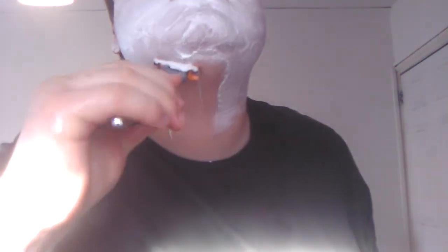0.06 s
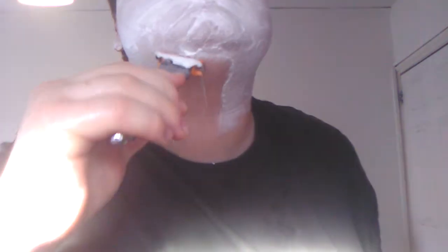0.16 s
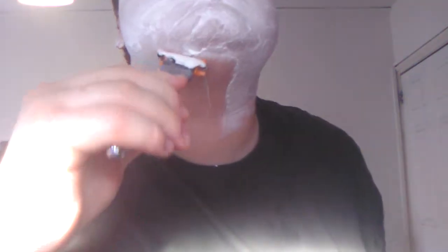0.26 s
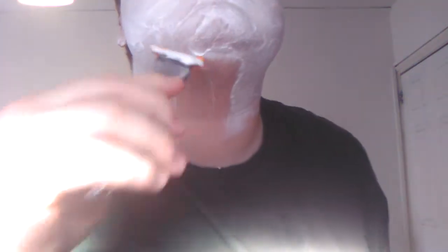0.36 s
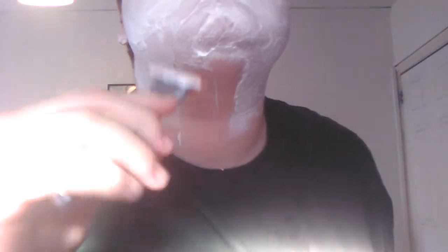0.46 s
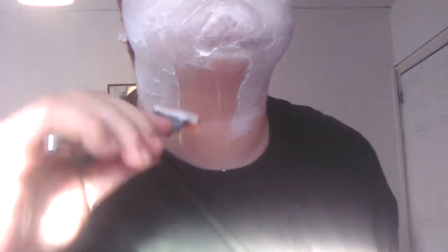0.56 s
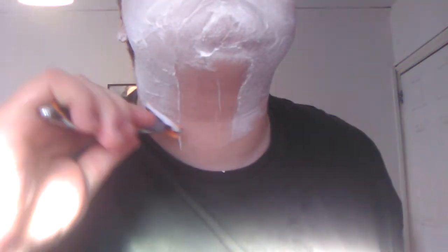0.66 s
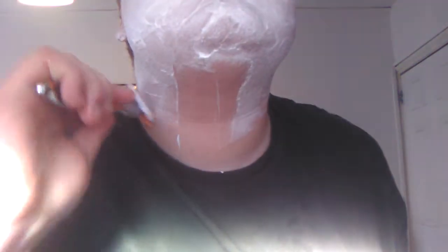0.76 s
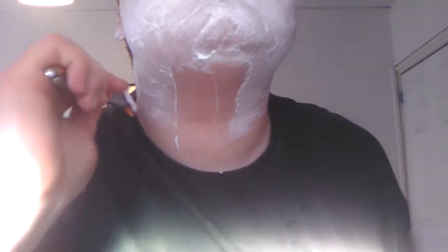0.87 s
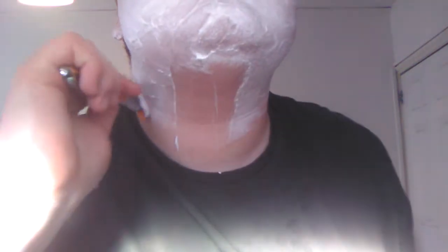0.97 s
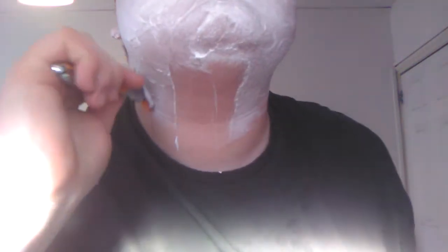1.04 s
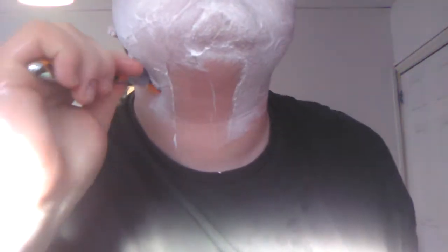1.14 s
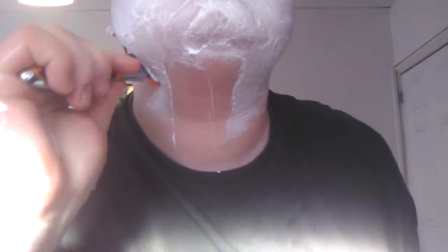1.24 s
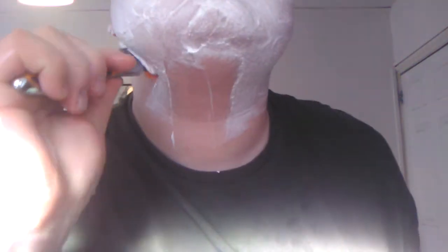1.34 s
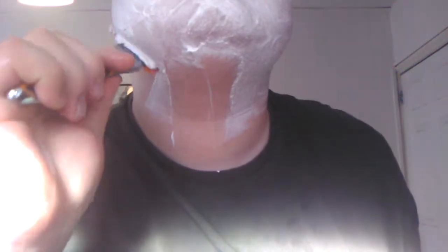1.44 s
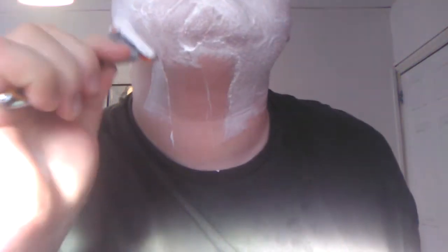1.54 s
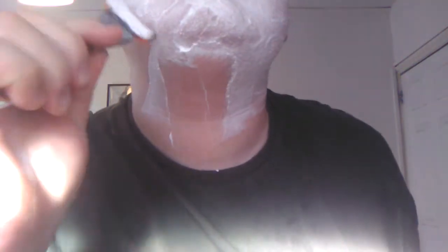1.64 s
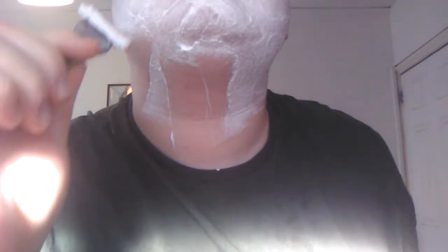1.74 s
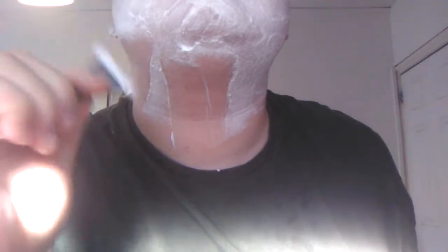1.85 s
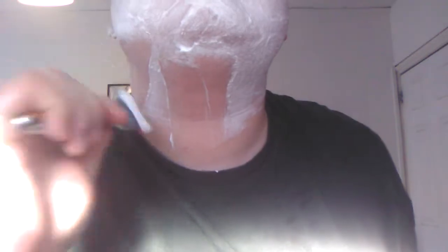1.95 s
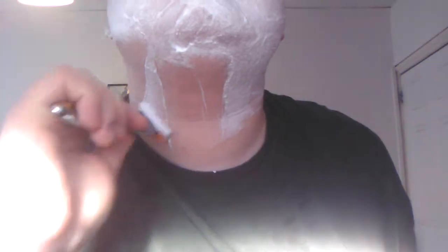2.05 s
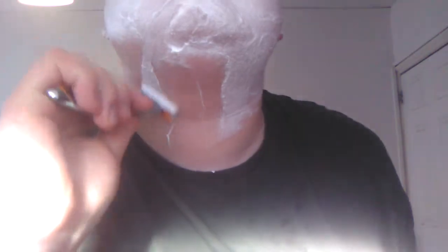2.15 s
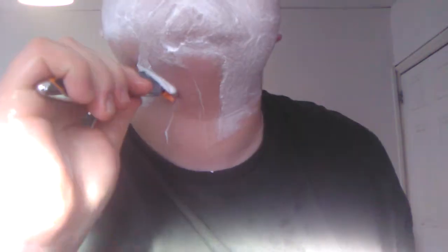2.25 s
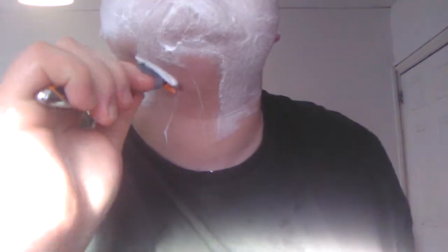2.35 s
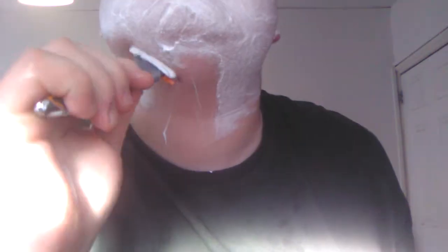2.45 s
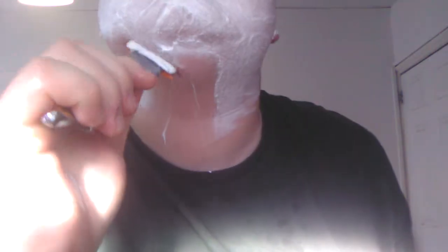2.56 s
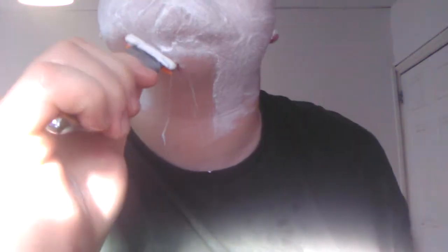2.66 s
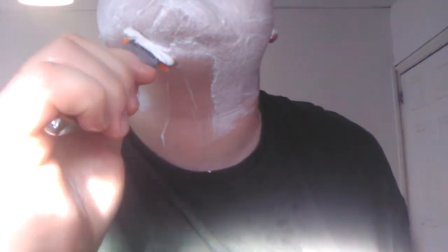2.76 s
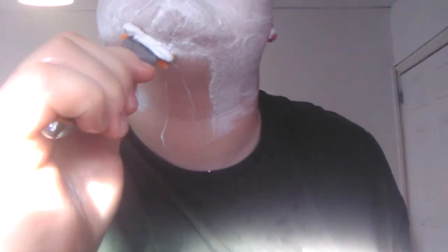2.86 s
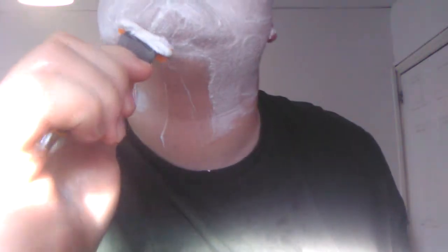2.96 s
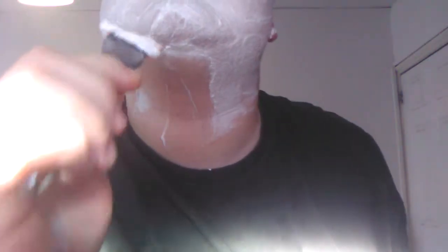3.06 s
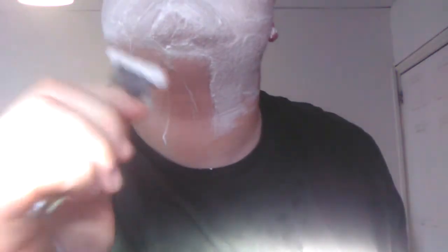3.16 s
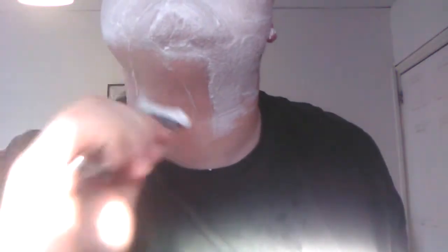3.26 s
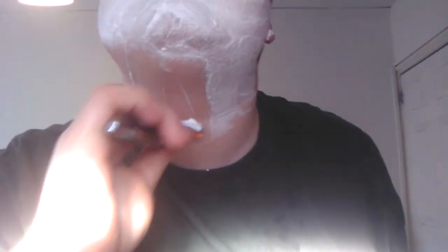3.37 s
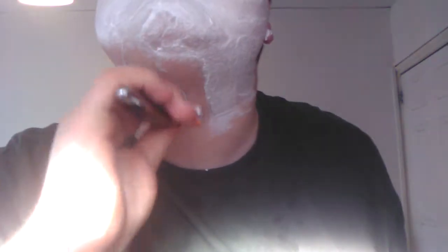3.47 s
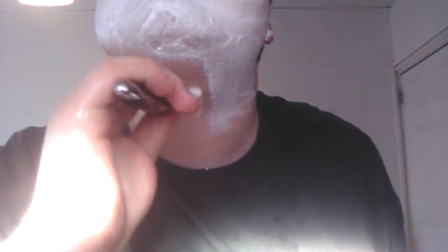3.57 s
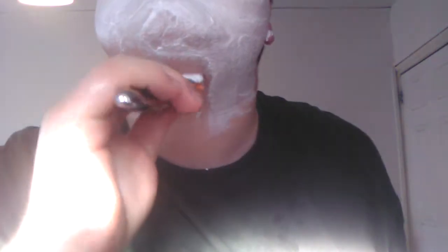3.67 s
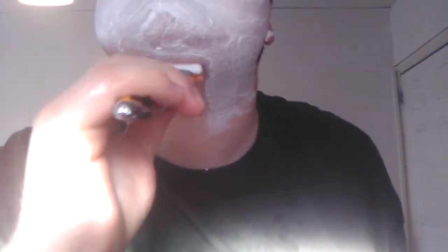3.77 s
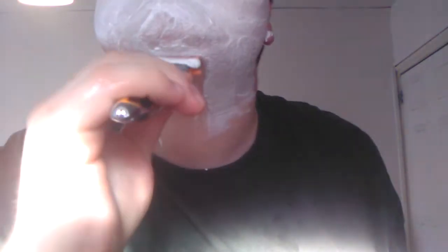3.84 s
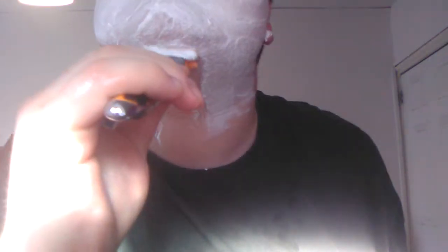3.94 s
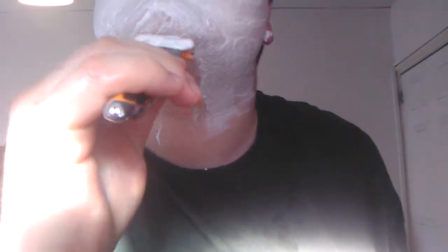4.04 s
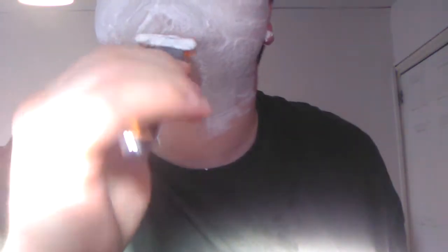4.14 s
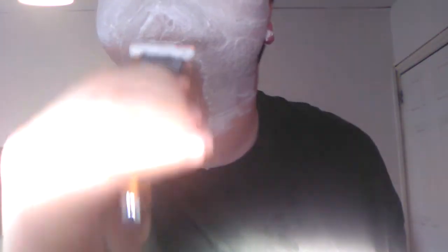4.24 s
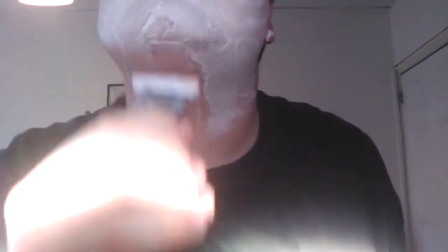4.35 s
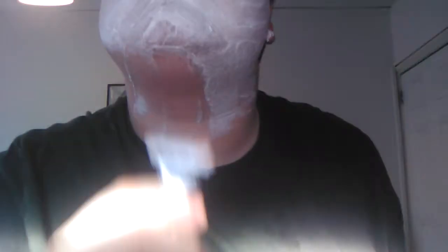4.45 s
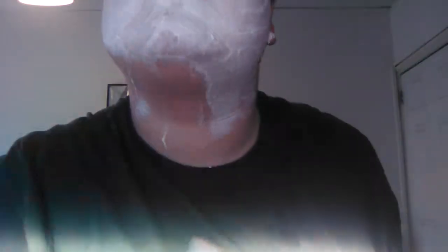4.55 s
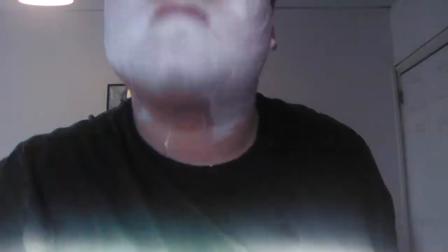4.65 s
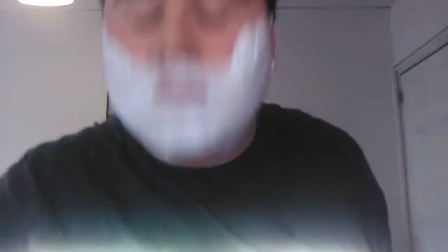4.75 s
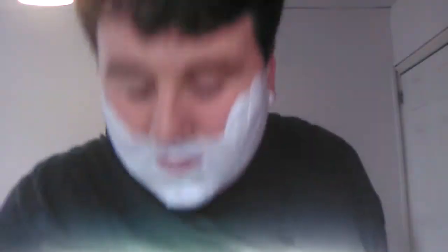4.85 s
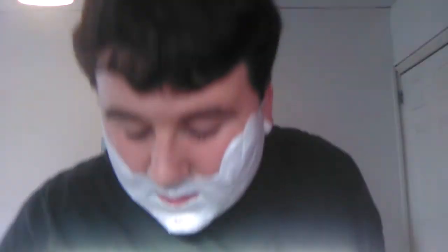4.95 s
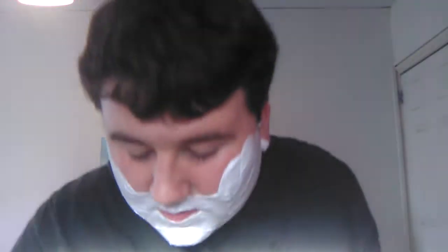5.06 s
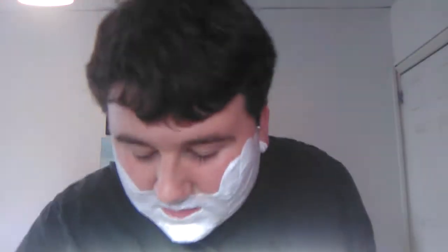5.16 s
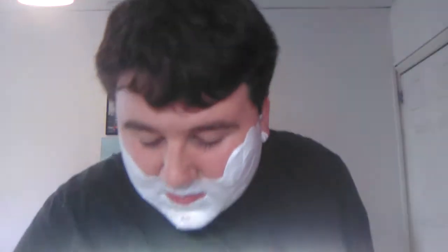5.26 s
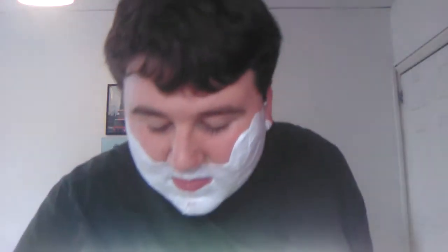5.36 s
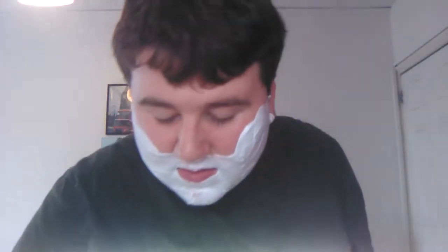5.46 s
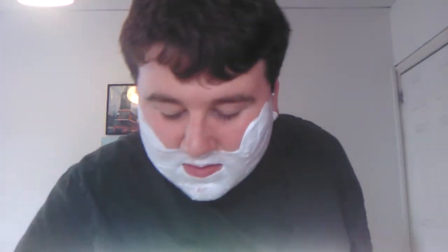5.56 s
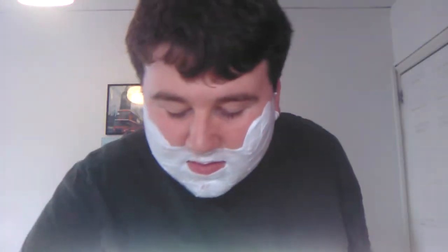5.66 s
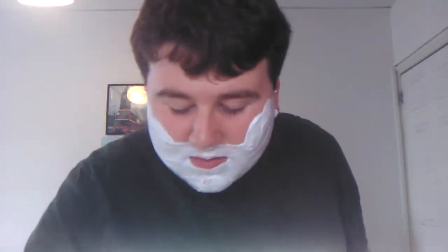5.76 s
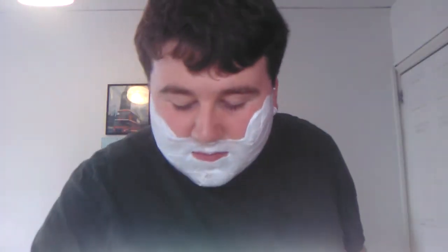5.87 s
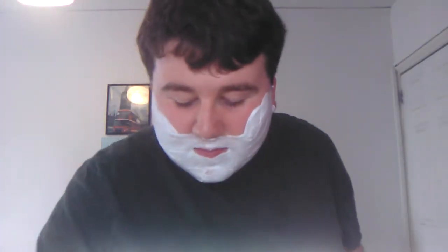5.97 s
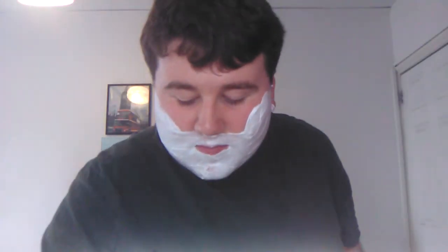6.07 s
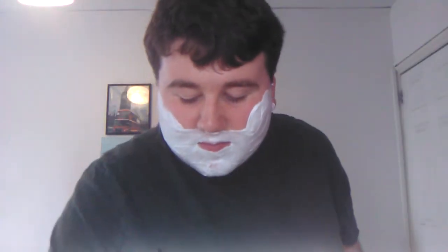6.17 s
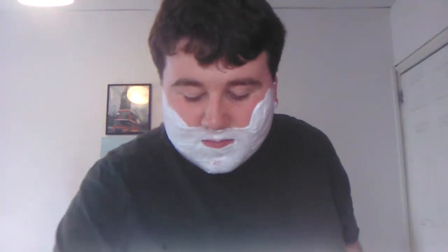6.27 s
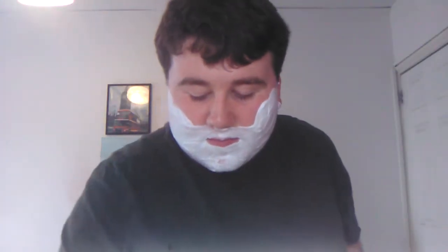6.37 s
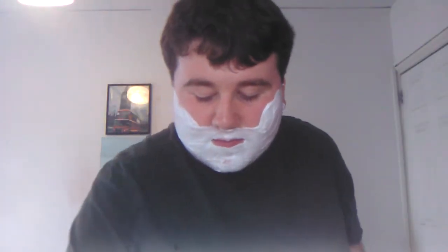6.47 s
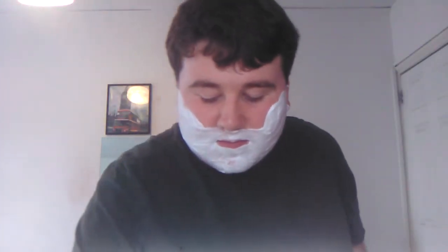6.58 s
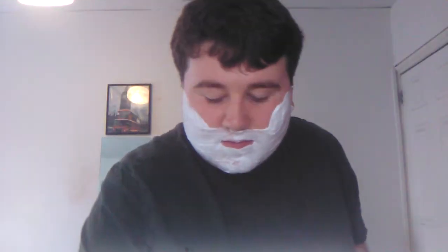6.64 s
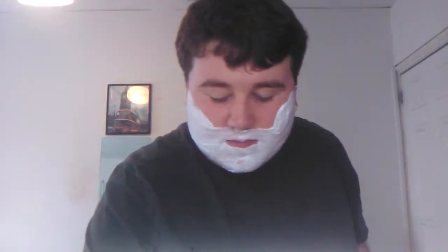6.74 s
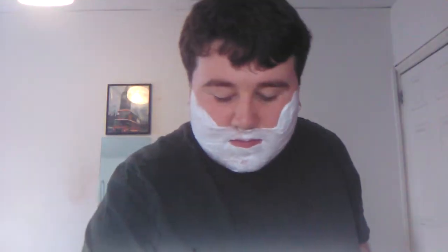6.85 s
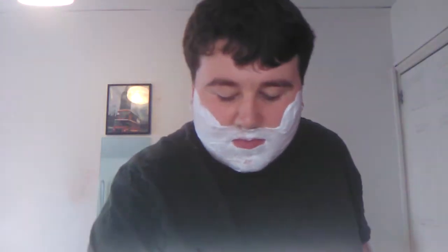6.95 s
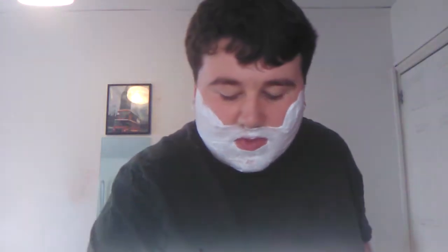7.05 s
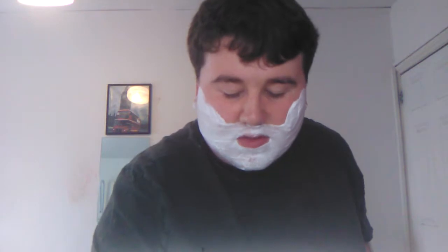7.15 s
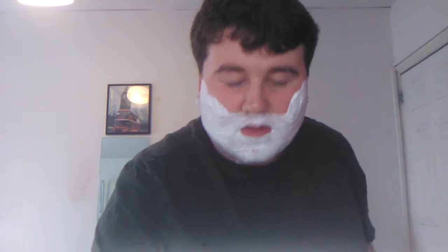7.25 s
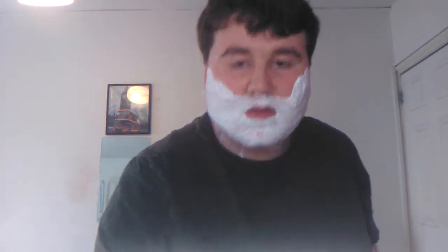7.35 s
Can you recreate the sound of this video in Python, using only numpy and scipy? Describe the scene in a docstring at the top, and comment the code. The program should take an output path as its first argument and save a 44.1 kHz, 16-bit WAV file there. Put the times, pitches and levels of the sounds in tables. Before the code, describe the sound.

Dry, grainy shaving scrapes come in separate strokes with short pauses, finishing in sharp little flicks, over faint room noise and a distant low engine drone at first. A soft knock and a dull bump fall between them. Then much louder water: the razor is shaken rapidly in a basin below the microphone, bubbling and splattering, before the water thins and the razor clicks against the rim. Small, lightly reverberant room.

```python
"""Short rasping strokes, a razor drawn up a foamed neck close to a stereo microphone in a small bare room:
clumped random clicks plus friction noise, shaped by spectra and stroke curves.
It is then shaken in a basin of water: rising-pitch bubbles, noise splashes and spray, thumps as noise
drives the basin's modes, a last tap as struck modes.
Under it lie the room's murmur, a wavering noise band, a far engine drone and air on the microphone."""
import sys
import numpy as np
from scipy import signal
from scipy.fft import rfft, irfft, next_fast_len
from scipy.io import wavfile
from scipy.ndimage import map_coordinates

SR = 44100
rng = np.random.default_rng(int(sys.argv[2]) if len(sys.argv) > 2 else 0)


def unload_wav(signal):
    """Save mono or channel-first audio to the path in sys.argv[1] as 16-bit WAV at rate SR, clipped to [-1, 1]."""
    wavfile.write(
        sys.argv[1],
        SR,
        np.round(np.clip(np.atleast_2d(signal).T, -1, 1) * 32767).astype(np.int16),
    )


N = 326781
T = np.arange(N) / SR
SIZE = next_fast_len(N)
ROOM_TAIL_DB = 6.5   # tail energy against a unit direct click

# Stereo tilt of the near sounds. Each row: frequency in Hz, left minus right in dB.
EARS = [(370, -4), (690, -2), (1270, 2), (2330, 4.5), (4290, 8.5), (7900, -4.5), (14600, -14.5)]
# Vigour of the rinse. Each row: time in seconds, churn level in dB, spray against the churn in dB.
RINSE = [(5.06, -64, -1), (5.1, -37.5, -13), (5.16, -51, -1), (5.23, -42, -9), (5.38, -36.5, -8.5),
         (5.47, -38, -5.5), (5.62, -33.5, -3), (5.74, -32.5, 2.5), (6.0, -36, -4.5), (6.15, -33.5, -3.5),
         (6.31, -33, -5), (6.45, -31.5, -6), (6.58, -34.5, -5.5), (6.72, -31, -9.5), (6.84, -43, -2.5),
         (6.95, -41.5, -7.5), (7.12, -48, -6.5), (7.26, -42.5, -0.5), (7.41, -45.5, -8)]
# Shakes of the razor under water. Each row: start in seconds, wave's push on the basin in dB,
# tilt towards the upper basin modes in dB per octave, swell of the churn's large bubbles in dB.
SHAKES = [(5.095, -63, 5, 5.5), (5.319, -61, 10, 5), (5.381, -74, 19.5, 1.5), (5.504, -60, 0, 8.5),
          (5.656, -60.5, 3.5, 9), (5.816, -63.5, 2.5, 9), (5.972, -59, -5, 5.5), (6.124, -54, -7, 3.5),
          (6.286, -59.5, -0.5, 9), (6.442, -62, 3, 2.5), (6.609, -62, -26, 5)]


def amp(db):
    """Decibels to an amplitude factor."""
    return 10 ** (np.asarray(db) / 20)


def rms_one(x):
    """Scale to rms 1 over all channels."""
    return x / np.sqrt(np.mean(x ** 2) + 1e-20)


def in_time(rows):
    """Columns joined by straight lines; the first, a level, is silent outside the rows."""
    s, level_db, *rest = np.transpose(rows)
    curves = [np.interp(T, s, level_db, -120, -120)]
    return curves + [np.interp(T, s, column) for column in rest]


def at_hz(points):
    """A spectrum read at every bin of the transform, straight lines over log frequency."""
    hz, value = np.transpose(points)
    bins_hz = np.arange(SIZE // 2 + 1) * SR / SIZE
    return np.interp(np.log(bins_hz + 1), np.log(hz), value)


def colour(x, spectrum, balance):
    """Two channels filtered by a spectrum, closed at its low end, and tilted left to right; rms 1."""
    closed = [(spectrum[0][0] / 2, -120)] + list(spectrum)
    gain = amp(at_hz(closed) + at_hz(balance) * [[.5], [-.5]])
    return rms_one(irfft(rfft(x, SIZE) * gain, SIZE)[:, :N])


def pair(likeness):
    """White noise in two channels, correlated by band as the table says."""
    mid, side = rfft(rng.standard_normal((2, SIZE)))
    alike = np.clip(at_hz(likeness), -1, 1)
    both = np.sqrt(1 + alike) * mid + np.sqrt(1 - alike) * side * [[1], [-1]]
    return irfft(both, SIZE)[:, :N]


def drift(rate_hz):
    """Slow random curve, spread about 1: random knots at twice the rate, joined smoothly."""
    knots = rng.standard_normal(1000)
    return map_coordinates(knots, [T * rate_hz * 2], order=3)


def grains(per_s, spread_db):
    """Random clicks of uneven size and sign; rms 1."""
    size_db = spread_db * np.minimum(rng.exponential(1, N), 5)
    sizes = amp(size_db) * rng.choice([-1, 1], N)
    return rms_one(sizes * (rng.random(N) < per_s / SR))


def ring(push, hz, t60_s):
    """Damped resonator: a unit click sets off a decaying sine of starting height 1."""
    r, w = amp(-60 / (t60_s * SR)), 2 * np.pi * hz / SR
    return signal.lfilter([0, np.sin(w)], [1, -2 * r * np.cos(w), r * r], push)


def struck(hits, modes):
    """Every blow rings every mode of the body with a strength of its own."""
    s, hit_db = np.transpose(hits)
    uneven_db = rng.normal(0, 1.5, (len(s), len(modes)))
    out = 0
    for k, (hz, mode_db, t60_s) in enumerate(modes):
        clicks = np.full(N, 1e-18)
        clicks[(s * SR).astype(int)] = amp(hit_db + mode_db + uneven_db[:, k]) * (-1) ** k
        out = out + ring(clicks, hz, t60_s)
    return out


def scatter(delays_s):
    """A click smeared by a chain of short all-pass echoes, which leave its colour alone."""
    x = (T[:SR // 3] == 0) * 1.
    for s in delays_s:
        loop = np.r_[1, np.zeros(int(s * SR) - 1), -.6]
        x = signal.lfilter(loop[::-1], loop, x)
    return x


def room(x, tail_db=ROOM_TAIL_DB):
    """Direct sound plus decaying tail: bass partly shared by both ears, treble scattered apart and dulled."""
    t60_s, wall_cut_hz, split_hz = 0.52, 3800, 1016
    # Echo delays off basin and body. Each row, left then right: first and second delay in seconds.
    echo_delays = [(.0002, .0008), (.0004, .0013)]
    t = T[:SR // 3]
    shared, *ears = rng.standard_normal((3, len(t)))
    fade = amp(-60 * t / t60_s) * (t > .003)
    fade *= amp(tail_db) / np.linalg.norm(fade)
    full = (t == 0) + fade * (0.32 * shared + 0.38 * np.array(ears))
    low = signal.lfilter(*signal.butter(2, split_hz, fs=SR), full)
    dull = signal.lfilter(*signal.butter(1, wall_cut_hz, fs=SR), fade * ears)
    early = np.array([scatter(delays) for delays in echo_delays])
    high = signal.lfilter(*signal.butter(2, split_hz, "high", fs=SR), early + dull)
    return signal.fftconvolve(x[None], low + high, axes=1)[:, :N]


def murmur():
    """Room murmur: broad noise of a fixed spectrum whose level drifts slightly."""
    # Each row: frequency in Hz, relative density in dB per Hz.
    spectrum = [(41, -25), (70, 2.5), (218, -3.5), (319, -2), (522, -19.5), (700, -9), (850, -13.5),
                (1000, -12), (1330, -23.5), (1590, -17.5), (2030, -29), (2430, -26), (5810, -34.5),
                (14500, -34)]
    # Each row: frequency in Hz, left minus right in dB.
    balance = [(200, -1), (700, -2), (2330, 3), (4290, 2.5), (7900, -2)]
    # Each row: frequency in Hz, left-right correlation.
    likeness = [(180, 1), (540, 0.48), (1400, -0.13), (3000, -0.096)]
    level_db = -48.5 + 0.44 * drift(2.75)
    return amp(level_db) * colour(pair(likeness), spectrum, balance)


def waver():
    """A faint noise band with a wandering centre: slow noise multiplied by a gliding sine."""
    # Each row: time in seconds, centre in Hz, sine's peak in dB.
    glide = [(.75, 970, -65), (0.862, 985, -52), (1.2, 851, -61), (1.45, 860, -50), (1.751, 794, -56),
             (1.9, 800, -92)]
    s, hz, db = np.transpose(glide)
    lowpass = signal.butter(2, 55, fs=SR, output="sos")
    slow = rms_one(signal.sosfilt(lowpass, rng.standard_normal((2, N))))
    carrier = np.sin(2 * np.pi * np.cumsum(np.interp(T, s, hz)) / SR)
    return slow * amp(np.interp(T, s, db, -120, -120)) * carrier


def drone():
    """Far engine: one low sine gliding in pitch and level."""
    # Each row: time in seconds, pitch in Hz, rms level in dB.
    glide = [(0.119, 44.6, -49), (.3, 46.2, -30), (.47, 50.6, -46), (.57, 53.8, -40), (.66, 50.8, -46),
             (.85, 44.84, -31), (0.969, 45.2, -39), (1.08, 42.7, -67), (1.22, 43, -37), (1.35, 47, -58)]
    s, hz, db = np.transpose(glide)
    tone = np.sin(2 * np.pi * np.cumsum(np.interp(T, s, hz)) / SR)
    return np.sqrt(2) * amp(np.interp(T, s, db, -120, -120)) * tone


def air():
    """Lumpy air on the microphone ports: very low sway and a faster flutter from the same noise."""
    # Each row: time in seconds, sway level in dB, mean flutter level in dB.
    levels = [(0, -31, -32.5), (.15, -32, -48), (2.0, -36, -57), (2.2, -28, -47), (2.4, -31.5, -38),
              (2.85, -33, -43), (3.1, -38, -51.5), (4.3, -34, -69), (4.7, -28, -53), (5.3, -34.5, -70),
              (5.75, -26.5, -75), (6.6, -30, -52), (6.9, -34, -74), (7.41, -28, -75)]
    # Each row: frequency in Hz, left-right correlation.
    likeness = [(12, .85), (25, .6), (100, .5)]
    sway_db, flutter_db = in_time(levels)
    gusts = pair(likeness)
    # spectra: Hz, relative dB per Hz; balances: Hz, left minus right dB
    sway = colour(gusts, [(4, 11.0), (22, 1.5), (34, -18.0), (60, -13.5), (100, -64.0)],
                  [(10, 0), (20000, 0)])
    flutter = colour(gusts, [(30, 1.0), (50, 3.5), (100, -9.5), (170, -12.5), (400, -51.0)],
                     [(30, 1.2), (200, 3.2)])
    return amp(sway_db) * sway + amp(flutter_db + 4.9 * drift(10)) * flutter


def puffs():
    """Air from the moving hand: each puff a push and pull of pressure, stronger on the left port."""
    # Each row: centre in seconds, peak before panning in dB.
    pushes = [(2.171, -33.5), (2.228, -36.5), (2.373, -26), (2.452, -25), (2.599, -29.5), (2.919, -32.5)]
    half_width_s, left_minus_right_db = 0.0035, 15.5
    out = 0
    for s, peak_db in pushes:
        u = (T - s) / half_width_s
        out = out - amp(peak_db) * u * np.exp(.5 - .5 * u ** 2)
    return out * amp([[left_minus_right_db / 2], [-left_minus_right_db / 2]])


def knocks():
    """A soft knock and a dull bump as struck modes, then the razor bouncing on the rim; a little to the left."""
    # Soft knock. Each row: start in seconds, strike in dB.
    tocks = [(.733, -47)]
    # Its modes. Each row: frequency in Hz, relative level in dB, t60 in seconds.
    wood = [(690, 10, 0.015), (900, 10, 0.025), (1540, -6, 0.015)]
    # Dull bump. Each row: start in seconds, strike in dB.
    bumps = [(3.09, -40)]
    # Its modes. Each row: frequency in Hz, relative level in dB, t60 in seconds.
    bump_modes = [(242, 0, 0.052), (385, -2.2, 0.077)]
    # Razor on the rim. Each row: start in seconds, strike in dB.
    taps = [(7.1772, -0.5), (7.191, -13), (7.205, -14), (7.218, -10)]
    # Its modes. Each row: frequency in Hz, relative level in dB, t60 in seconds.
    razor_modes = [(2170, -7.5, 0.0084), (2550, -8, 0.0099), (3970, -24.5, 0.016)]
    dull = room(struck(tocks, wood) + struck(bumps, bump_modes))
    rim = room(struck(taps, razor_modes), tail_db=-3)   # nearer than the water: less tail
    return (dull + rim) * amp([[1.5], [-1.5]])


def waves(rise_s, fall_s):
    """A wave does not land at once: a noisy push that swells and fades drives the basin's modes."""
    # Each row: frequency in Hz, relative drive in dB, t60 in seconds.
    basin = [(147, -5, 0.19), (163.3, 0.5, 0.1), (222.5, 4, 0.051), (296, 1.5, 0.054), (382.2, -8, 0.64)]
    s, push_db, lift_db, _ = np.transpose(SHAKES)
    t = T[:SR // 4]
    swell = (1 - np.exp(-t / rise_s)) * np.exp(-t / fall_s)
    out = 0
    for hz, mode_db, t60_s in basin:
        octaves = np.log2(hz / basin[1][0])   # from the second mode
        starts = np.zeros(N)
        starts[(s * SR).astype(int)] = amp(push_db + mode_db + lift_db * octaves)
        push = signal.fftconvolve(starts, swell)[:N] * rng.standard_normal(N)
        out = out + ring(push, hz, t60_s)
    return signal.sosfilt(signal.butter(2, [115, 600], "band", fs=SR, output="sos"), out)


def bubbles(rows, cycles, rise, attack=0.98):
    """Dying sines whose pitch climbs as the bubble nears the surface; each rings so many nominal cycles."""
    out, t = np.zeros(N + SR), T[:SR // 12]
    for s, db, hz in rows:
        turns = hz * t[:int(cycles / hz * SR)]
        shape = amp(db - 60 * turns / cycles) * (1 - np.exp(-attack * turns))
        out[int(s * SR):][:len(turns)] += shape * np.sin(2 * np.pi * turns * (1 + rise * turns / cycles))
    return out[:N]


def swarm(low_hz, high_hz, cycles, spread_db, count):
    """Bubbles born at random moments of the rinse, with random sizes; rms 1."""
    moment, size, loud = rng.random((count, 3)).T
    start = RINSE[0][0]
    starts = start + moment * (T[-1] - start)
    levels_db = -spread_db * np.log(loud + 0.067)
    pitches_hz = low_hz * (high_hz / low_hz) ** size
    return rms_one(bubbles(zip(starts, levels_db, pitches_hz), cycles, rise=0.1))


def single_bubbles():
    """Separate bubbles: dying sines, gently rising in pitch, all with one decay time."""
    # Each row: start in seconds, level before onset and room in dB, starting pitch in Hz.
    rows = [(5.214, -12.5, 737), (5.344, -9.5, 760), (5.388, -9, 384), (5.411, -7.5, 737),
            (5.469, -12, 550), (5.471, -24.5, 3480), (5.507, -8, 930), (5.535, -5.5, 750), (5.56, -2, 683),
            (5.659, -16.5, 1600), (5.697, -22, 666), (5.713, -6, 713), (5.736, -10, 760), (5.75, -10, 800),
            (5.775, -15.5, 2080), (5.821, -9, 1417), (5.874, -14, 696), (6.03, -2, 728), (6.088, -8, 570),
            (6.145, -15, 1850), (6.247, -15, 2600), (6.262, -21, 2490), (6.29, -11, 820), (6.321, -8, 1364),
            (6.328, -14, 750), (6.35, -7.5, 790), (6.436, -20, 780), (6.454, -26, 4130), (6.488, -17, 1900),
            (6.52, -20, 3600), (6.552, -5, 750), (6.639, -19, 2500), (6.697, -18, 3600), (6.66, -9.5, 760),
            (6.702, -6, 736), (6.748, -13.5, 557), (6.865, -29, 2550), (6.896, -21, 2264),
            (6.934, -23, 2800), (6.936, -28, 4090), (6.947, -23, 1410), (6.988, -24, 2520),
            (7.084, -29, 3920), (7.257, -23, 2170), (7.296, -14.5, 836), (7.325, -17.5, 754)]
    t60_s = 0.032
    singles = sum(bubbles([row], cycles=t60_s * row[2], rise=0.032, attack=0.71) for row in rows)
    return room(singles, tail_db=1.5)


def splats(wash):
    """Each drop bursts with a short crack around its own pitch, then a broad spatter dies away."""
    # Each row: start in seconds, level in dB, pitch of the crack in Hz.
    drops = [(5.095, -37.5, 3500), (5.195, -33, 5800), (5.2227, -32, 10500), (5.283, -43, 9000),
             (5.298, -33.5, 10200), (5.338, -31.5, 5000), (5.453, -41, 9500), (5.4988, -27.5, 6600),
             (5.537, -22, 8950), (5.6203, -24, 11200), (5.660, -22, 4840), (5.698, -27, 9000),
             (5.82, -29, 9050), (5.971, -30, 6030), (6.090, -28.5, 9000), (6.129, -26.5, 8300),
             (6.184, -34.5, 9000), (6.243, -48, 9000), (6.266, -33, 10500), (6.284, -26, 5970),
             (6.335, -29, 10500), (6.402, -37, 9600), (6.598, -46, 6000), (6.629, -34.5, 9000),
             (6.701, -30, 5570), (6.714, -28.5, 9400), (6.755, -33, 12000), (6.895, -41.5, 8500),
             (7.044, -41, 8050), (7.127, -37.5, 8450), (7.219, -41, 8350)]
    # Each row: frequency in Hz, relative density in dB per Hz.
    spectrum = [(1200, -7), (2000, 8), (5000, 1.5), (9200, -6), (12900, -13.5), (14800, -18)]
    crack_width, broad_width = 0.14, 1.87   # bandwidth over pitch
    crack_db, crack_t60_s, broad_t60_s, rise_s = -0.5, 0.037, 0.12, .0015
    t, out = T[:SR // 8], np.zeros((2, N + SR))
    clicks = [grains(4000, spread_db=2.5) for _ in wash]
    spatter = np.pad(colour(wash + clicks, spectrum, EARS), ((0, 0), (0, SR)))
    for s, db, hz in drops:
        span = slice(int(s * SR), int(s * SR) + len(t))
        crack = rms_one(signal.lfilter(*signal.iirpeak(hz, 1 / crack_width, fs=SR), spatter[:, span]))
        broad = rms_one(signal.lfilter(*signal.iirpeak(hz, 1 / broad_width, fs=SR), spatter[:, span]))
        fall = amp(crack_db - 60 * t / crack_t60_s) * crack + amp(-60 * t / broad_t60_s) * broad
        out[:, span] += amp(db) * (1 - np.exp(-t / rise_s)) * fall
    return out[:, :N]


def rinse():
    """Churned water: large and small bubbles on a wash of noise, with spray above, single bubbles and drops."""
    # Large bubbles. Each row: frequency in Hz, relative density in dB per Hz.
    gurgle = [(250, -15.5), (380, -9), (445, -22), (540, -1.5), (780, 7.5), (980, 6.5), (1160, 3.5),
              (1400, -55)]
    # Small bubbles. Each row: frequency in Hz, relative density in dB per Hz.
    fizz = [(1180, -5.5), (1440, 5), (1900, 2.5), (2500, 2.5), (3500, 2), (6000, -5.5), (8000, -47)]
    # Spray. Each row: frequency in Hz, relative density in dB per Hz.
    spray_spectrum = [(3500, -1), (5000, 0), (7030, -1.5), (9200, -2.5), (12900, -8.5), (14800, -15.5)]
    gurgle_db, swell_lag_s, swell_width_s = -5, 0.064, 0.044   # the gurgle swells just after each shake
    patch_hz, gaps_db = 7500, 4   # spray above and below this pitch comes and goes apart
    churn_db, spray_db = in_time(RINSE)
    swell_db = sum(db * np.exp(-.5 * ((T - s - swell_lag_s) / swell_width_s) ** 2) for s, _, _, db in SHAKES)
    wash, slosh = rng.standard_normal((2, N)), drift(20)

    large = room(swarm(250.3, 1200, cycles=18.0, spread_db=2.1, count=450)) + 0.093 * wash
    small = room(swarm(1182.0, 6600, cycles=43.4, spread_db=3.0, count=800), tail_db=5.5) + 0.49 * wash
    clumps = grains(2500 * amp(4.6 * drift(45)), spread_db=3.0)
    spray = room(clumps, tail_db=5.5) + 0.89 * wash

    churn = colour(large, gurgle, EARS) * amp(gurgle_db + swell_db + 0.89 * slosh)
    churn += colour(small, fizz, EARS) * amp(1.72 * slosh)
    spray = colour(spray, spray_spectrum, EARS) * amp(spray_db)
    dull = signal.filtfilt(*signal.butter(2, patch_hz, fs=SR), spray)
    for part in (dull, spray - dull):
        churn += part * amp(gaps_db * np.minimum(drift(22), 0))
    return amp(churn_db) * churn + single_bubbles() + splats(wash)


def below(x):
    """Sound from under the microphone: an all-pass turns the right ear's phase in the low middle."""
    turn_hz, width_hz = 381.4, 14.5
    r = np.exp(-np.pi * width_hz / SR)
    poles = [1, -2 * r * np.cos(2 * np.pi * turn_hz / SR), r * r]
    return np.array([x[0], signal.lfilter(poles[::-1], poles, x[1])])


def flick(s, length_s, peak_db, bright_db):
    """The curve of one flick: quick rise, arched hold that brightens, fast drop, faint tail."""
    attack_s, release_s, tail_s = 0.028, 0.025, 0.11
    shoulder_db, foot_db, tail_db = peak_db - 4.5, peak_db - 16, peak_db - 38
    end, dull_db, sharp_db = s + length_s, bright_db - 3.5, bright_db + 3.5
    return [(s - attack_s, foot_db, dull_db),
            (s, shoulder_db, dull_db),
            (s + length_s / 2, peak_db, bright_db),
            (end, shoulder_db, sharp_db),
            (end + release_s, foot_db, bright_db),
            (end + release_s + tail_s, tail_db, dull_db)]


def razor():
    """The blades snap stubble and pop foam cells: dense clicks in uneven clumps over friction noise."""
    # Drags over the skin, one list a stroke. Each row: time in seconds, rasp level in dB, brightness in dB.
    strokes = [
        [(0, -43.5, -5), (.06, -55.5, 5), (.12, -55, 1), (.2, -45.5, 0.5), (.27, -47.5, 2.5), (.33, -67.5, 0),
         (.37, -67, 20)],
        [(1.0, -76, -10), (1.13, -71, 2), (1.16, -50, -7), (1.23, -49.5, -7), (1.27, -59, -2.5),
         (1.52, -50, -3.5), (1.6, -58, -6)],
        [(2.18, -70, -10), (2.225, -57, -4), (2.34, -57, -3), (2.45, -48.5, -6.5), (2.62, -50, -5),
         (2.7, -48, 0.5), (2.93, -48.5, 1.5), (3.0, -73, 13)],
        [(3.42, -68.5, -18), (3.6, -61.5, -1), (3.64, -55, -7), (3.8, -54.5, -5), (3.94, -57.5, 1.5),
         (3.98, -51, -3), (4.08, -46, -7.5), (4.16, -58.5, -2), (4.2, -68, 1)],
    ]
    # Quick flick off the skin ending each stroke. Each row: start in seconds, length in seconds,
    # peak level in dB, brightness in dB.
    flick_rows = [(0.352, 0.035, -49, -1.5), (1.562, 0.13, -39.5, -2.5), (2.972, 0.068, -39.5, -2),
                  (4.191, 0.042, -44, -6.5)]
    # Single stiff hairs snapping. Each row: start in seconds, level in dB.
    hairs = [(0.3596, -32), (2.2218, -50), (4.222, -41)]
    # Low rasp. Each row: frequency in Hz, relative density in dB per Hz.
    low_spectrum = [(1700, -17), (2100, -3.5), (2400, 3.5), (2850, -3), (3750, 2.5), (4200, -0.5),
                    (4800, 2.5), (5600, -6), (6500, -17), (9000, -24.5)]
    # High rasp. Each row: frequency in Hz, relative density in dB per Hz.
    high_spectrum = [(4500, -15), (6500, -4), (9900, 0.5), (13000, -1), (14800, -31)]
    # The skin under a firm stroke. Each row: frequency in Hz, relative density in dB per Hz.
    body_spectrum = [(1050, -10), (1350, 0.5), (1600, 5.5), (1900, -17), (2300, -49)]
    firm_db, firm_slope = -28.5, 0.57   # rasp level where skin equals low rasp; its extra dB per dB
    friction, flicker_db, snap_t60_s = .3, 1.8, 0.016

    clicks = grains(2000 * amp(3.5 * drift(60)), spread_db=2.0)
    rasp = room(clicks, tail_db=3.0) + friction * rng.standard_normal((2, N))
    low, high, body = (colour(rasp, spectrum, EARS) * amp(flicker_db * drift(18))
                       for spectrum in (low_spectrum, high_spectrum, body_spectrum))
    out = 0
    for stroke in strokes + [flick(*row) for row in flick_rows]:
        rasp_db, bright_db = in_time(stroke)
        firm = amp(firm_slope * (rasp_db - firm_db))   # the harder the stroke, the more the skin joins in
        out = out + amp(rasp_db) * (low + amp(bright_db) * high + firm * body)
    for s, level_db in hairs:
        out = out + (T >= s) * amp(level_db - 60 * np.abs(T - s) / snap_t60_s) * high
    return out


def scene():
    """Sum of the background, the air, the knocks, the basin and the razor."""
    background = murmur() + waver() + drone() + air()
    basin_water = below(rinse() + waves(rise_s=0.00089, fall_s=0.052))
    return background + puffs() + knocks() + basin_water + razor()


def record(dry):
    """Finish of the whole sound: a shallow dip near 7 kHz, then a steep cut above 14 kHz."""
    dip_hz, dip_width_hz, dip_share, cutoff_hz = 7120, 610, 0.42, 14280
    dip = signal.lfilter(*signal.iirpeak(dip_hz, dip_hz / dip_width_hz, fs=SR), dry)
    top_cut = signal.ellip(16, .5, 85, cutoff_hz, fs=SR, output="sos")
    return signal.sosfilt(top_cut, dry - dip_share * dip)


dry = scene()
out = record(dry)
unload_wav(out)
```